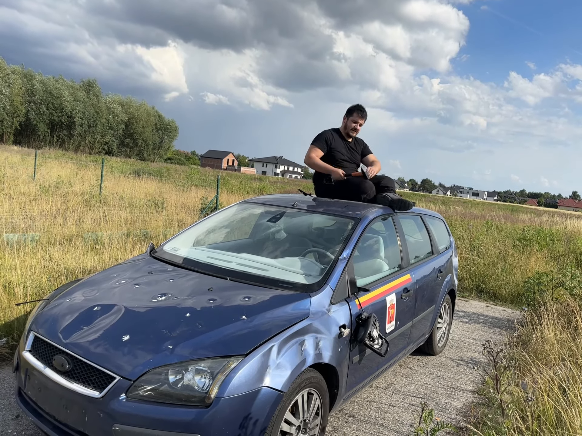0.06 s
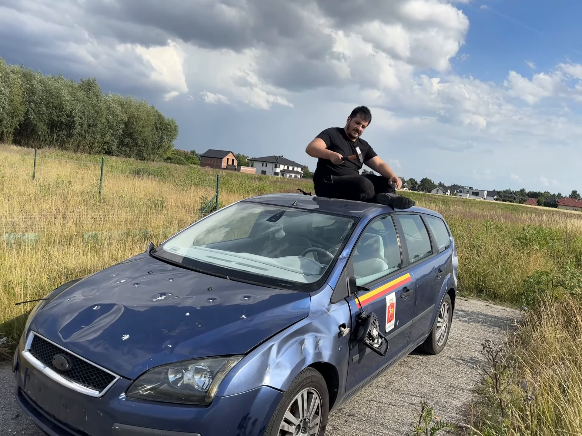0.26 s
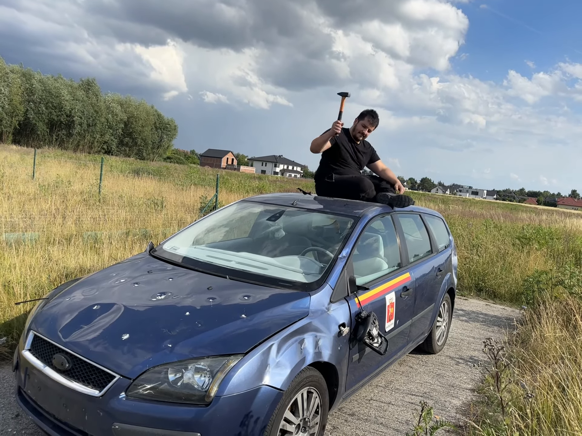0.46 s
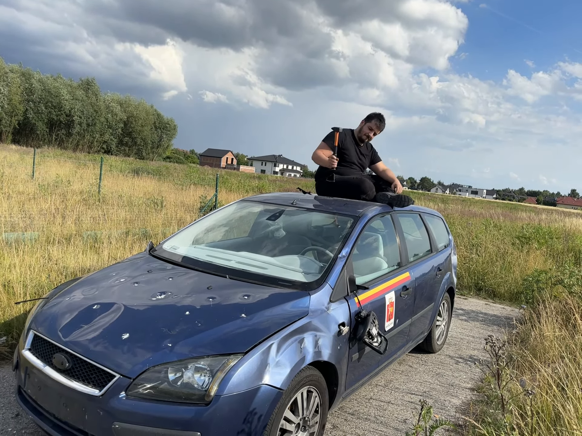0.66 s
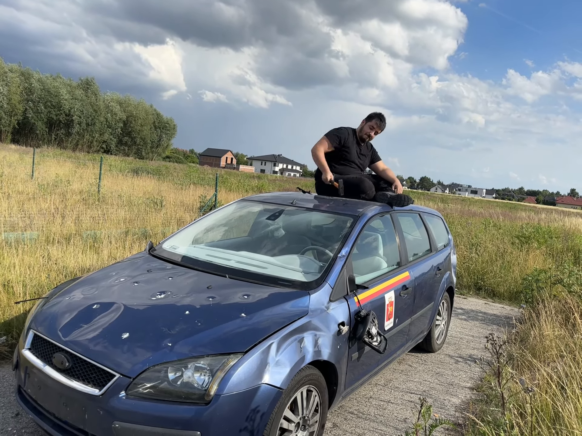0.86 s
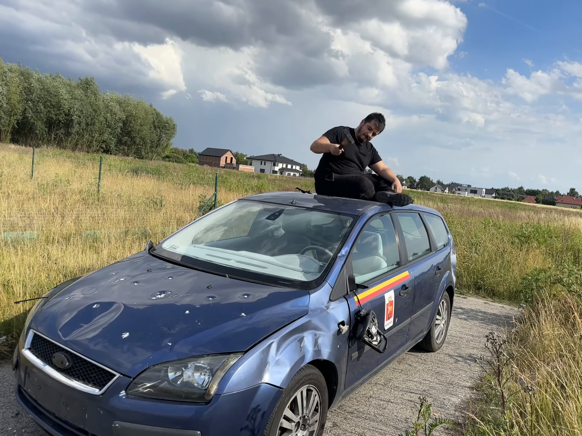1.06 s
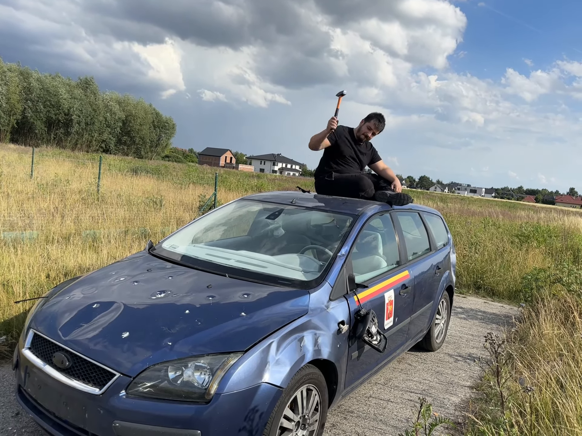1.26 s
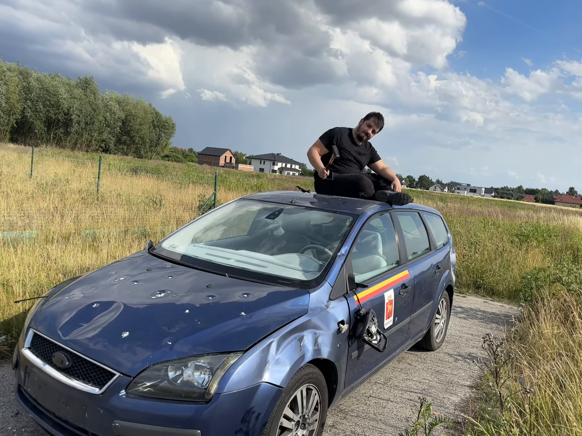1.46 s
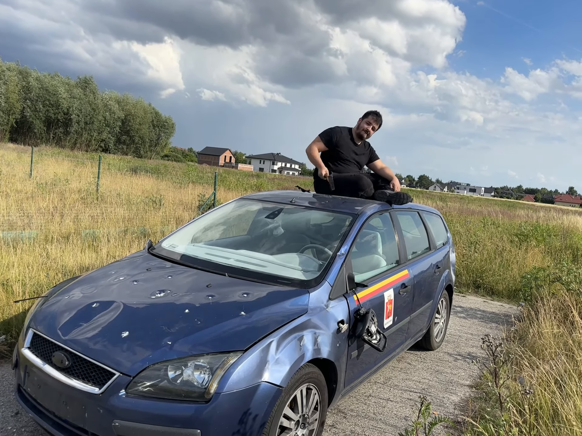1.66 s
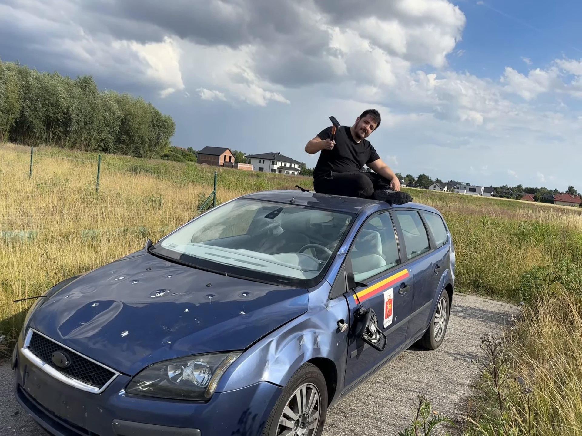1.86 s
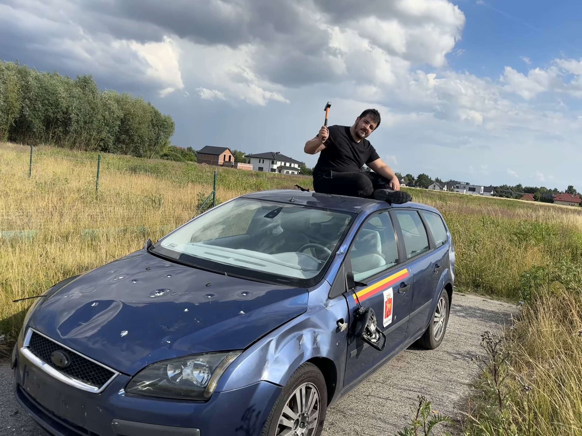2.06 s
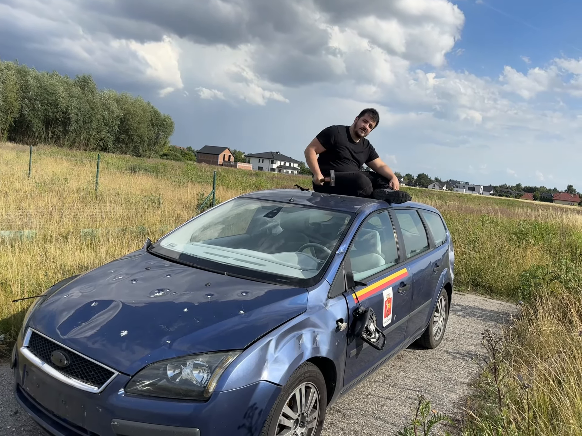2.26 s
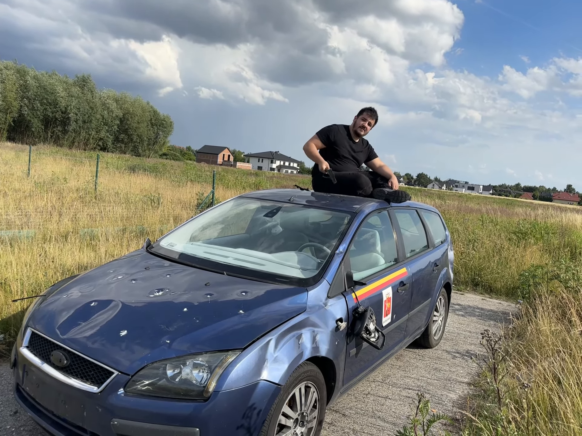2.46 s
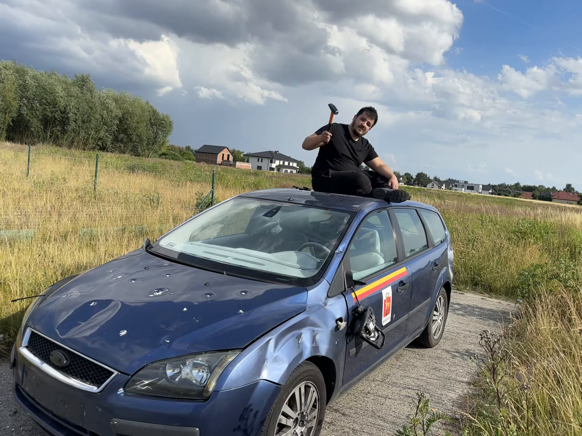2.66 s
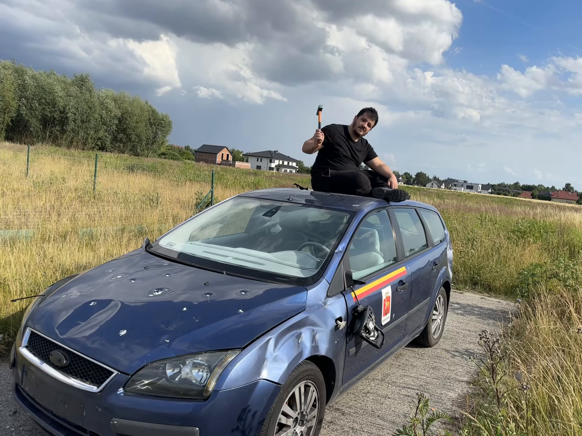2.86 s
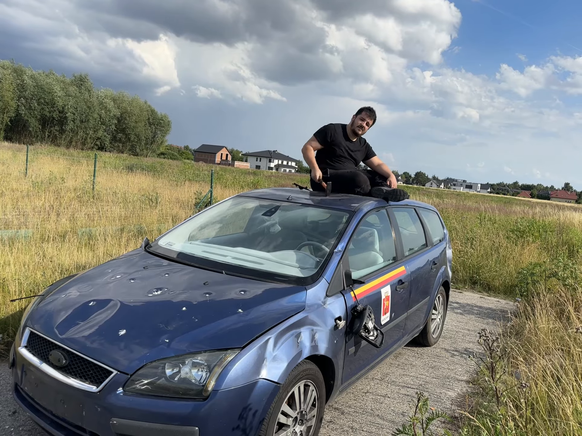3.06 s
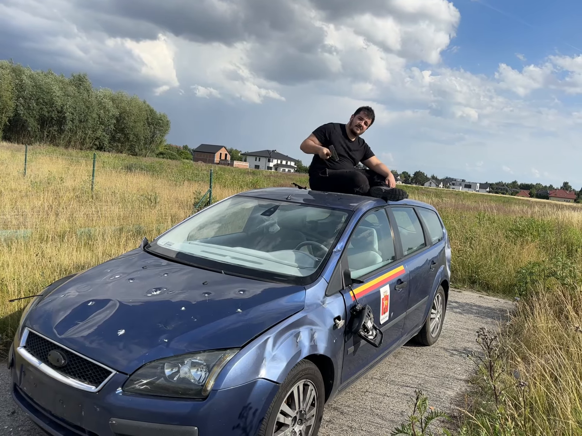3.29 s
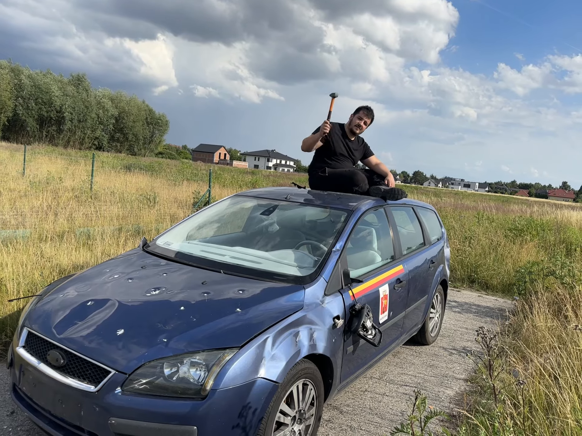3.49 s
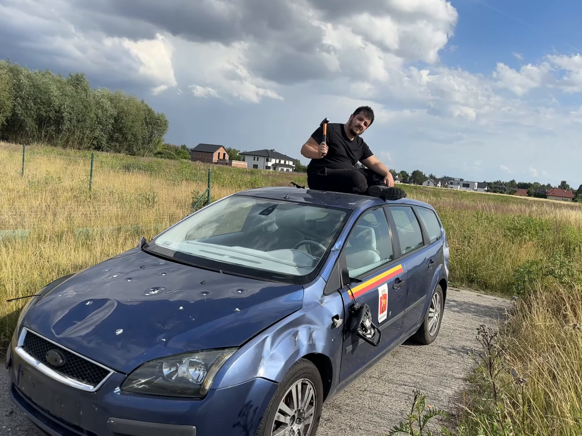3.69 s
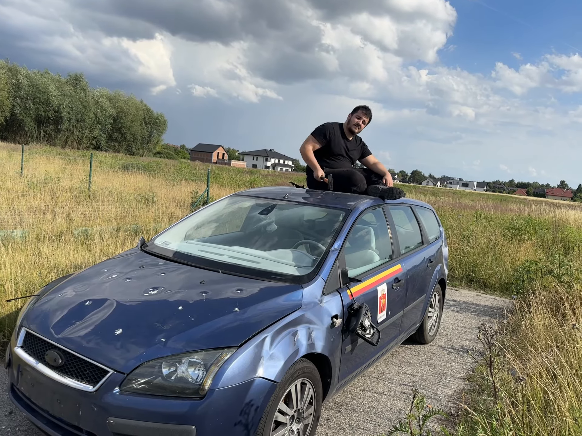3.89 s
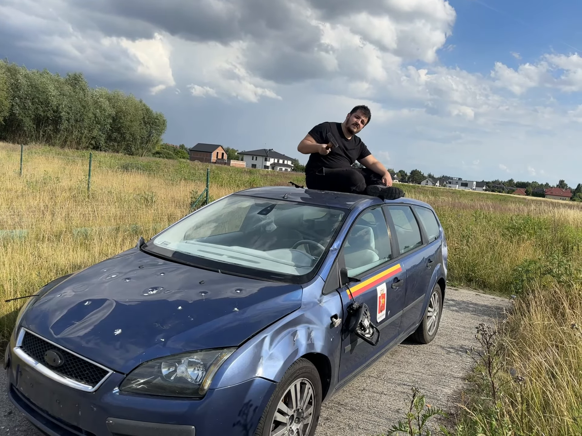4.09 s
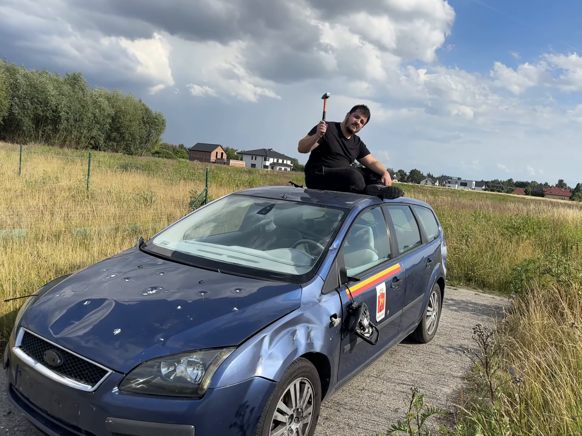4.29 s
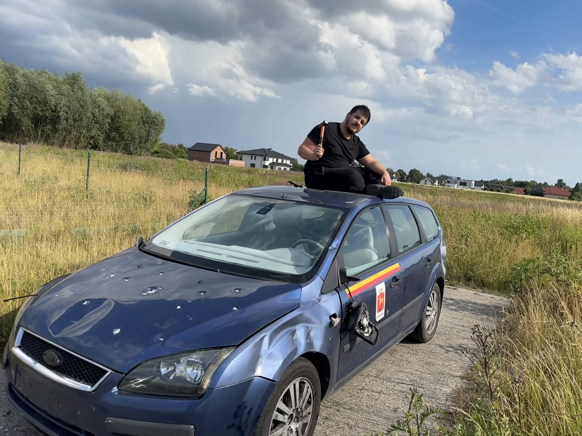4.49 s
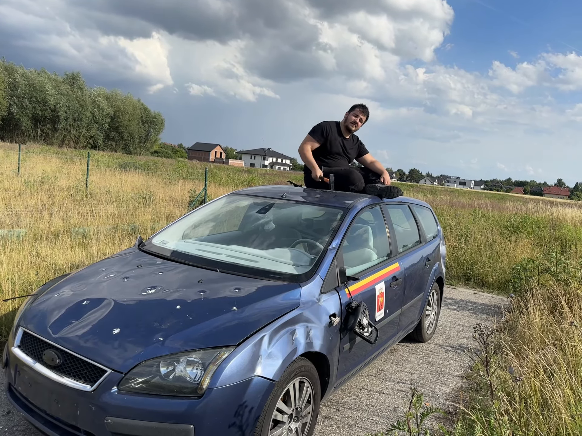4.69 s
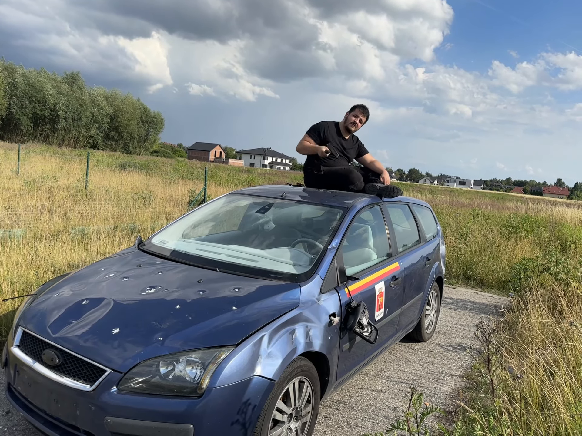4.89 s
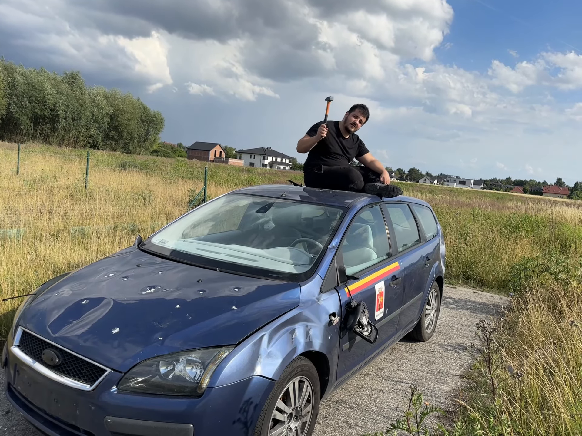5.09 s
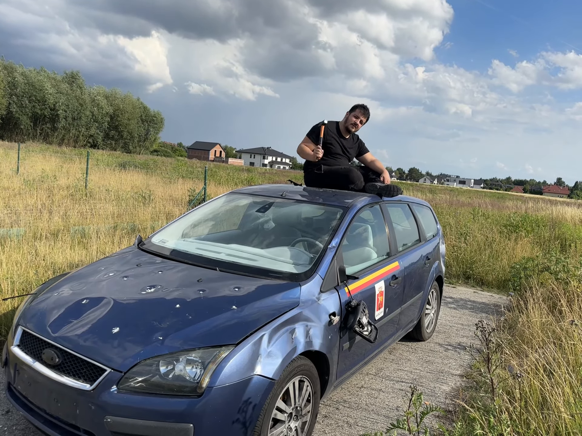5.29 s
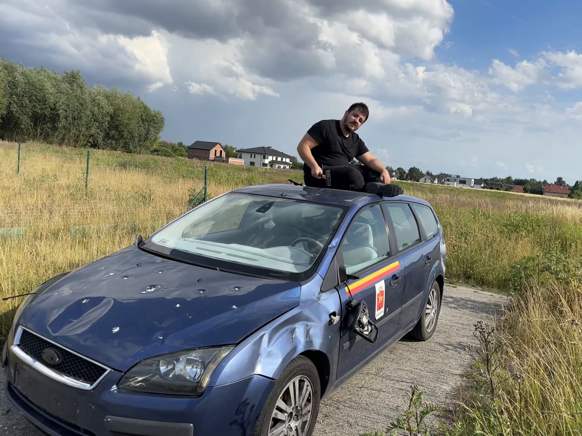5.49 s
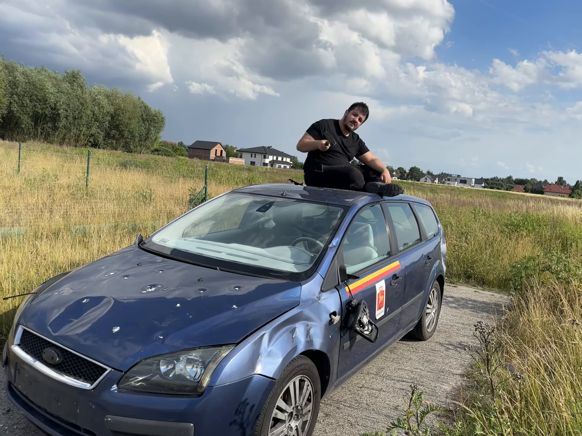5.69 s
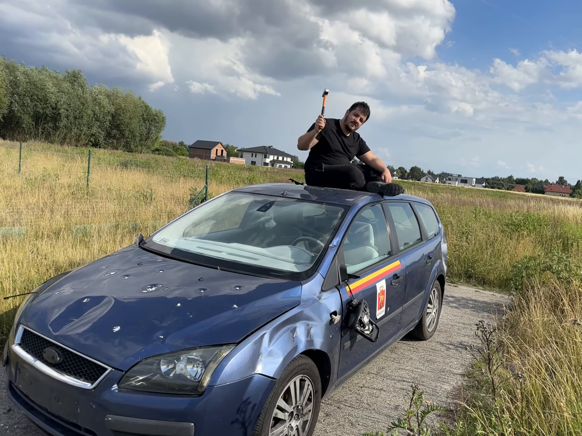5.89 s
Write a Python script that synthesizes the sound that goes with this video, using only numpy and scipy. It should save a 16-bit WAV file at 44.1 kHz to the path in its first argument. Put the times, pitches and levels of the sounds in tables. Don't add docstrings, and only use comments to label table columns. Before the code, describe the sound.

Open field, no echo. At first a jet passes away high above: a low rumbling roar, airy hiss and a fluttering fan whine that slowly sinks in pitch. Tiny bird chirps sound at the start and around 0.3 s; a soft low thud at 0.44 s is weight shifting on a car roof. Then a hammer hits the roof at about 0.8, 1.55, 2.35, 3.1, 3.9, 4.7 and 5.45 s. Each blow is a sharp steel crack and damped sheet clang with a hollow cabin boom; within a tenth of a second the metal buckles, the hammer head rebounds and loose trim chatters, then it dies quickly. The fourth is hardest, the fifth softest. In the gaps the weakening jet, faint ticks on the roof and a few distant bird pips near 2.8-2.95 s remain; thin, high grasshopper scraping returns after 4.4 s. The loud peaks are softly limited.

```python
import sys
import numpy as np
from scipy import signal
from scipy.fft import rfft, irfft
from scipy.io import wavfile
from scipy.ndimage import uniform_filter1d, map_coordinates

SR = 44100
rng = np.random.default_rng(int(sys.argv[2]) if len(sys.argv) > 2 else 0)


def persist_wave(psi):
    counts = np.round(np.clip(psi, -1, 1) * 32767).astype(np.int16)
    wavfile.write(sys.argv[1], SR, np.atleast_2d(counts).T)


def convert_level_to_amplitude(level_db):
    exponent = np.asarray(level_db, float) / 20
    return 10 ** exponent


N = 262346


def unit(x):
    return x / np.sqrt(np.mean(x ** 2) + 1e-20)


def along(points, hz):
    f, v = np.transpose(points)
    return np.interp(np.log(hz + 1), np.log(f + 1), v)


def curves(rows):
    s, *cols = np.transpose(rows)
    return [np.interp(np.arange(N) / SR, s, c) for c in cols]


def wobble(knots_per_s):
    knots = rng.standard_normal(int(N * knots_per_s / SR) + 4)
    return map_coordinates(knots, [np.arange(N) * knots_per_s / SR])


def causal(gain):
    size = 2 ** 14
    cepstrum = irfft(np.log(gain(np.fft.rfftfreq(size, 1 / SR)) + 1e-6))
    cepstrum[1:size // 2] *= 2
    cepstrum[size // 2 + 1:] = 0
    pulse = irfft(np.exp(rfft(cepstrum)))[:size // 2]
    return pulse / np.linalg.norm(pulse)


def coloured(x, spectrum):
    return signal.fftconvolve(x, causal(lambda hz: convert_level_to_amplitude(along(spectrum, hz))))[:len(x)]


def with_modes(spectrum, modes):
    def gain(hz):
        peaks_db = sum(db / (1 + (2 * (hz - centre) / width) ** 2) for centre, width, db in modes)
        return convert_level_to_amplitude(along(spectrum, hz) + peaks_db)
    return causal(gain)


def rush(spectrum, patchy_db):
    z = signal.stft(rng.standard_normal(N), nperseg=512)[2]
    field = uniform_filter1d(rng.standard_normal(z.shape), size=4, axis=0)
    field = uniform_filter1d(field, size=10, axis=1)
    noise = signal.istft(z * convert_level_to_amplitude(patchy_db * unit(field)), nperseg=512)[1][:N]
    return unit(coloured(noise, spectrum))


# start_s, level_db
HOPPER_LEVEL = [(0, -80), (.8, -86), (1.4, -85), (1.8, -112), (3.9, -108), (4.4, -89), (5.2, -82.5),
                (5.95, -79)]
# freq_hz, density_db_per_hz
WING_SPECTRUM = [(11500, -30), (12600, -6), (13000, 0), (13500, -5), (14000, -1), (14600, -5), (15200, -1),
                 (16000, -20)]
# start_s, length_s, from_hz, to_hz, level_db
BIRD_NOTES = [
    (.014, .024, 16000, 5000, -63),
    (.04, .035, 4000, 4300, -63),
    (.272, 0.053, 9160, 8200, -64),
    (2.787, .025, 3400, 3950, -68),
    (2.82, .016, 3400, 4300, -63),
    (2.84, .017, 3650, 4150, -64),
    (2.862, .014, 3750, 4100, -72),
    (2.945, 0.034, 4520, 3420, -63.5),
]


def meadow():
    stroke = np.cumsum(105 + 9 * wobble(30)) / SR % 1
    buzz = unit((0.3 + np.exp(-4 * stroke)) * rush(WING_SPECTRUM, patchy_db=3))
    rows = []
    for s, length, from_hz, to_hz, db in BIRD_NOTES:
        rows += [(s - 0.004, from_hz, -130), (s, from_hz, db - 5)]
        rows += [(s + 0.44 * length, 0.5 * from_hz + 0.37 * to_hz, db)]
        rows += [(s + length, to_hz, db - 8), (s + length + 0.003, to_hz, -130)]
    hz, db = curves(rows)
    phase = 2 * np.pi * np.cumsum(hz * (1 + 0.05 * wobble(2500))) / SR
    birds = convert_level_to_amplitude(db - 8 + 3 * wobble(200)) * np.sin(phase)
    return convert_level_to_amplitude(curves(HOPPER_LEVEL)[0]) * buzz + birds + convert_level_to_amplitude(-119) * rng.standard_normal(N)


# time_s, lag_ms
GROUND_LAG = [(0, 2.58), (1.5, 2.8), (3, 2.9), (4.3, 3.36), (5.95, 3.86)]


def off_ground(x, share):
    late = map_coordinates(x, [np.arange(N) - curves(GROUND_LAG)[0] * SR / 1000], order=1)
    return x + share * signal.lfilter(*signal.butter(1, 1100, fs=SR), late)


# time_s, pitch_hz
FAN_PITCH = [(0, 1362), (.5, 1348), (1.3, 1338), (2.2, 1322), (3, 1312), (3.75, 1300), (4.3, 1287),
             (5, 1278), (5.95, 1270)]
# centre_s, level_db, length_s
FAN_SWELLS = [(.04, -49, .16), (.33, -48, .16), (.49, -48, .07), (.61, -46, .1), (.74, -49, .12),
              (1.16, -51, .09), (1.27, -53, .07), (1.42, -53, .14), (1.82, -57, .05), (1.95, -61, .1),
              (2.2, -62, .12), (2.5, -55, .09), (2.62, -57, .1), (2.77, -58, .1), (2.97, -54, .14),
              (3.32, -60, .08), (3.42, -57, .06), (3.59, -58, .12), (3.77, -52, .11), (4.11, -53, .17),
              (4.28, -54, .09), (4.39, -56, .04), (4.57, -51, .2), (4.9, -56, .2), (5.31, -61, .08),
              (5.67, -64, .3)]


def fan_tone():
    calm_db = -73.5
    t = np.arange(N) / SR
    turn = 2 * np.pi * np.cumsum(curves(FAN_PITCH)[0] + 4 * wobble(40)) / SR
    swell = convert_level_to_amplitude(calm_db)
    for s, db, length in FAN_SWELLS:
        swell = swell + convert_level_to_amplitude(db) * np.exp(-(2 * (t - s) / length) ** 4)
    return convert_level_to_amplitude(1 + 1.6 * wobble(30)) * swell * (np.sin(turn) + convert_level_to_amplitude(-27) * np.sin(2 * turn))


# time_s, strength_db, heaviness_db
JET_STRENGTH = [(0.15, -43, 0), (0.32, -47.5, 9), (0.5, -43, 0), (0.67, -43.5, 6.5), (1.15, -46, 4.5),
                (1.55, -44, 6), (1.74, -53.5, 3.5), (2.19, -54, 4.5), (2.65, -56.5, 9.5), (2.8, -54, 14),
                (2.95, -57, 10), (3.5, -59, 7.5), (3.74, -57, 7.5), (4.2, -53.5, 10.5), (4.37, -52, 7),
                (4.54, -53, 7), (5.2, -57, 4.5), (5.8, -54.5, 8)]
# freq_hz, density_db_per_hz
RUMBLE_SPECTRUM = [(15, -58.5), (25, -31), (30, -25), (39, -17), (65, 2.5), (140, -3.5), (200, -11.5),
                   (260, -45), (440, -120)]
ROAR_SPECTRUM = [(100, -30.5), (170, -1.5), (194, 1), (307, -2), (345, -4), (520, -10.5), (680, -51),
                 (1140, -120)]
RUSH_SPECTRUM = [(260, -27), (450, -4), (513, -2), (1160, -6.5), (1290, -4.5), (1500, -16), (1950, -28),
                 (3300, -120)]
HISS_SPECTRUM = [(820, -29.5), (1400, 0), (1460, -3.5), (2120, -10.5), (3370, -22.5), (4870, -29.5),
                 (6000, -42), (9000, -52), (11700, -67.5), (19800, -120)]


def jet():
    strength_db, heavy_db = curves(JET_STRENGTH)
    t = np.arange(N) / SR
    swing_db = strength_db + 50
    air = wobble(8.5)
    roar = convert_level_to_amplitude(strength_db + heavy_db - 5.5 + 2.0 * air) * rush(ROAR_SPECTRUM, patchy_db=2.0)
    roar += convert_level_to_amplitude(strength_db - 3.5 + 1.1 * air) * rush(RUSH_SPECTRUM, patchy_db=2.5)
    rumble_db = -39 + 0.52 * swing_db - 0.9 * t
    hiss_db = -55 + 0.63 * swing_db - 0.63 * t
    rumble = convert_level_to_amplitude(rumble_db - 2.5 + 1.6 * wobble(12)) * rush(RUMBLE_SPECTRUM, patchy_db=1.0)
    hiss = convert_level_to_amplitude(hiss_db - 2.0 + 0.4 * air) * rush(HISS_SPECTRUM, patchy_db=2.6)
    return fan_tone() + rumble + off_ground(roar, share=0.55) + hiss


def thud():
    u = (np.arange(N) / SR - 0.4385) / 0.004
    return convert_level_to_amplitude(-24.0) * (u * u - 1) * np.exp(-u * u / 2)


# start_s, peak_db, t60_s, dullness_db_per_octave
TOUCHES = [
    (0.4375, -37, 0.04, -3),
    (1.256, -53, 0.021, 2),
    (1.3678, -62, 0.02, 3),
    (2.838, -54, 0.014, -3.5),
    (2.8607, -56, 0.022, 3),
    (5.1107, -56.5, 0.017, -7),
    (5.1274, -67, 0.026, -6),
    (5.139, -61, 0.02, -1),
    (5.2204, -64, 0.02, -1),
]
# freq_hz, density_db_per_hz
SCUFF_SPECTRUM = [(710, -32), (1200, 3.5), (1740, 3.5), (2120, -6.5), (5330, -13.5), (6080, -24),
                  (15300, -35.5), (16500, -38)]


def taps():
    out, t = np.zeros(N + SR), np.arange(SR // 8) / SR
    for s, db, t60, dull_db in TOUCHES:
        decay = convert_level_to_amplitude(-60 * t / t60) + convert_level_to_amplitude(-4.5 - 60 * t / (2.3 * t60))
        puff = convert_level_to_amplitude(db + 2.5) * decay * (1 - np.exp(-t / 0.0015)) * rng.standard_normal(len(t))
        tilt = causal(lambda hz: convert_level_to_amplitude(along(SCUFF_SPECTRUM, hz) - dull_db * np.log2(hz / 4000 + 0.01)))
        out[round((s - 0.001) * SR):][:len(t)] += signal.fftconvolve(puff, tilt)[:len(t)]
    return out[:N]


def rattles(count=16):
    chatter_db, scatter_db, fade_db_per_s = -47.5, 2, 211
    past_sway_s, hush_db, hush_s = 0.072, -6, 0.014
    rows = [(s, db - 37.5) for s, db, _ in PANEL_JOLTS]
    for (s, *_), (hop, _, lull, _, sway) in zip(HAMMER_BLOWS, HEAD_REBOUNDS):
        span = hop + sway + past_sway_s - s
        when = s + span * (np.arange(count) + rng.random(count)) / count
        db = chatter_db + scatter_db * rng.standard_normal(count)
        db = db - fade_db_per_s * np.maximum(when - hop, 0)
        db = db + hush_db * np.exp(-((when - hop + lull) / hush_s) ** 2)
        rows += zip(when, db)
    return rows


# start_s, peak_db
TRIM_KNOCKS = [(0.8425, -50), (0.8803, -25), (0.906, -48), (0.9108, -44), (0.948, -52), (0.9683, -54),
               (1.61, -36), (1.632, -35.5), (1.65, -43), (1.6737, -52), (1.6933, -52), (2.3529, -34),
               (2.3877, -42), (2.4217, -37.5), (2.4724, -51), (2.494, -50.5), (3.115, -33), (3.159, -36),
               (3.166, -37.5), (3.1917, -45), (3.2239, -54), (3.9583, -33.5), (3.9885, -56), (4.709, -36),
               (4.7433, -42), (4.775, -50), (5.482, -40), (5.5277, -40), (5.5578, -45), (5.6, -60)]
# freq_hz, density_db_per_hz
STEEL_SPECTRUM = [(3530, -26), (6000, -4.5), (7320, -24), (7940, -13.5), (8840, -12), (10400, -5.5),
                  (12400, -10.5), (13700, -2), (16000, -5), (16800, -21.5)]


def clicks():
    top, low = np.zeros((2, N + SR))
    t = np.arange(SR // 20) / SR
    cracks = [(s, db, 7.5) for s, _, _, db in HAMMER_BLOWS]
    trim = [(s, db, 7) for s, db in TRIM_KNOCKS + rattles()]
    for s, db, low_db in cracks + trim:
        a, b = rng.standard_normal((2, len(t))) * (1 - np.exp(-t / 0.00017))
        fizz = convert_level_to_amplitude(-17.5 + 0.51 * db - 60 * t / 0.05)
        top[round(s * SR):][:len(t)] += convert_level_to_amplitude(db + 2.0) * a * (convert_level_to_amplitude(-60 * t / 0.0051) + fizz)
        low[round(s * SR):][:len(t)] += convert_level_to_amplitude(db + low_db - 5 - 60 * t / 0.013) * b
    low_spectrum = [(1800, -23.5), (2500, 4.5), (4000, -7), (6000, -12.5), (8000, -30)]
    return coloured(top, STEEL_SPECTRUM)[:N] + coloured(low, low_spectrum)[:N]


def grains(rough_db):
    return rng.standard_normal(N) * convert_level_to_amplitude(rough_db * wobble(140))


# start_s, shudder_db, lull_before_s, lull_db, last_sway_after_s
HEAD_REBOUNDS = [
    (0.877, -11, 0.021, -22, 0.024),
    (1.609, -12, 0.015, -12, 0.041),
    (2.394, -9, 0.02, -20.5, 0.028),
    (3.154, -10, 0.013, -21, 0.03),
    (3.962, -17, 0.044, -18.5, .025),
    (4.757, -16, 0.041, -20, 0.027),
    (5.524, -13, 0.015, -23.5, .045),
]
# after_s, under_rebound_db
SETTLING = [(.0, -12.5), (0.033, -33.5), (.11, -44.5), (.26, -48)]
GRIT_OVER_BODY = [-13, -23.5, -25.5, -35.5, -21, -17.5, -13.5, -18]
# freq_hz, density_db_per_hz
GRIT_SPECTRUM = [(900, -30), (1600, -3), (3000, -15), (5000, -29), (7500, -42), (15000, -40), (16300, -60)]


def shudder():
    shake_db, knee_db, sag_s, rest_db = -9, -12.5, 0.014, -62
    rows = []
    for (s, *_), (hop, hop_db, lull, lull_db, sway) in zip(HAMMER_BLOWS, HEAD_REBOUNDS):
        stages = [(s + 0.00069, shake_db), (hop - lull - sag_s, knee_db)]
        stages += [(hop - lull, lull_db), (hop, hop_db)]
        for after, under_db in SETTLING[:-1]:
            stages.append((hop + sway + after, max(hop_db + under_db, rest_db)))
        stages.append((hop + sway + SETTLING[-1][0], rest_db))
        rows.append((s - 0.001, -60, -24))
        rows += [(*stage, bright) for stage, bright in zip(stages, GRIT_OVER_BODY)]
    db, bright_db = curves(rows)
    body = unit(signal.fftconvolve(grains(4.5), with_modes(CLANG_SPECTRUM, PANEL_MODES))[:N])
    grit = unit(coloured(grains(3.5), GRIT_SPECTRUM))
    shaking = db > -59.5
    return shaking * (convert_level_to_amplitude(db - 9) * body + convert_level_to_amplitude(db + bright_db + 2.0) * grit)


# freq_hz, t60_s
SHEET_DAMPING = [(80, 0.2), (260, 0.78), (700, 0.39), (1840, 0.086), (5000, 0.054)]


def dense_ring(stretch):
    hz, t, z = signal.stft(rng.standard_normal(SR // 2), SR, nperseg=256)
    t60 = stretch * along(SHEET_DAMPING, hz)[:, None]
    return signal.istft(z * convert_level_to_amplitude(-60 * t / t60), SR, nperseg=256)[1]


# start_s, peak_db, boom_db, crack_db
HAMMER_BLOWS = [
    (0.8122, -7.5, -1, -18),
    (1.5621, -5, -6.5, -17.5),
    (2.332, -5.5, -9, -17.5),
    (3.094, -4.5, -6, -22.5),
    (3.882, -9.5, -3, -20.5),
    (4.6832, -7.5, -2, -20),
    (5.464, -9, -1.5, -17.5),
]
# start_s, peak_db, boom_db
PANEL_JOLTS = [(0.8356, -9, -14), (0.8561, -8, -32), (0.8796, -4, -10.5), (1.6073, -9, -16),
               (1.6233, -15.5, 0), (1.634, -12, -6.5), (2.3504, -7.5, -3.5), (2.404, -8.5, -15),
               (2.421, -23.5, -2.5), (3.1118, -7, -9), (3.1462, -9, -2), (3.1646, -8.5, -19),
               (3.899, -7, -18.5), (3.9357, -14.5, -4.5), (3.948, -9, -9.5), (4.702, -6, -11),
               (4.7335, -7.5, -5), (4.7534, -10, -4), (4.773, -19, -7.5), (5.4884, -7, -9),
               (5.5149, -18.5, 2), (5.534, -11.5, -5.5), (5.558, -22.5, 2)]
# freq_hz, density_db_per_hz
CLANG_SPECTRUM = [(210, -28), (350, -1.5), (428, -3.5), (571, -3), (672, -7.5), (842, -3), (1140, -3),
                  (1230, -5), (1340, -6), (1500, -6), (2540, -22.5), (4930, -40.5), (7000, -44.5),
                  (9100, -73), (15400, -120)]
BOOM_SPECTRUM = [(24, -40), (40, -3.5), (151, 3), (329, 0.5), (427, -12), (554, -11), (600, -16),
                 (780, -30), (1320, -120)]
# freq_hz, width_hz, gain_db
PANEL_MODES = [(310, 45, 5), (460, 55, 3), (735, 55, 3), (950, 90, 3), (1225, 55, 7), (1520, 60, 5.5),
               (1830, 75, 3.5), (2320, 140, 3)]
CABIN_MODES = [(212, 40, 1), (278.5, 12, 3.5), (318.5, 17, 5), (352, 4.7, 2), (408.5, 12, 13), (484, 11, 1)]


def blows_and_jolts():
    clang, boom = np.zeros((2, N + SR))
    sway_db, sway_boom_db = -36, 4.8
    sways = [(s + after, sway_db, sway_boom_db) for s, *_, after in HEAD_REBOUNDS]
    for s, db, boom_db, *_ in HAMMER_BLOWS + PANEL_JOLTS + sways:
        ring = dense_ring(0.51)
        t = np.arange(len(ring)) / SR
        shape = (1 - np.exp(-t / 0.0012)) * (1 + 1.8 * np.exp(-t / 0.006))
        clang[round(s * SR):][:len(ring)] += convert_level_to_amplitude(db - 10.5) * ring * shape
        boom[round(s * SR):][:len(ring)] += convert_level_to_amplitude(db + min(boom_db, 2) - 7.5) * dense_ring(0.47) * shape
    panel = signal.fftconvolve(clang, with_modes(CLANG_SPECTRUM, PANEL_MODES))
    cabin = signal.fftconvolve(boom, with_modes(BOOM_SPECTRUM, CABIN_MODES))
    return (panel + cabin)[:N]


# time_s, gain_db
GAIN_DUCK = [(.81, 2), (.85, 1.5), (1.0, -5.5), (1.12, 1)]


def scene():
    background = convert_level_to_amplitude(curves(GAIN_DUCK)[0]) * (jet() + meadow())
    car = thud() + taps() + clicks() + shudder() + blows_and_jolts()
    return (car + background)[None]


def low_pass(x):
    return signal.sosfilt(signal.butter(12, 17090, fs=SR, output="sos"), x)


def record(dry):
    heard = signal.sosfilt(signal.butter(3, 42, "high", fs=SR, output="sos"), dry)
    held = heard / (1 + np.abs(heard / 0.67) ** 7) ** (1 / 7)
    held = signal.sosfilt(signal.cheby2(10, 50, 17100, fs=SR, output="sos"), held)
    return low_pass(held)


dry = scene()
out = record(dry)
persist_wave(out)
```